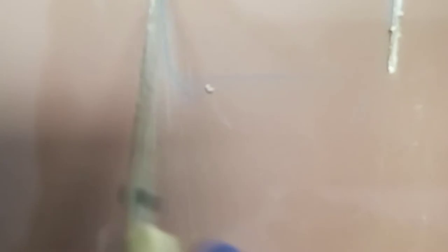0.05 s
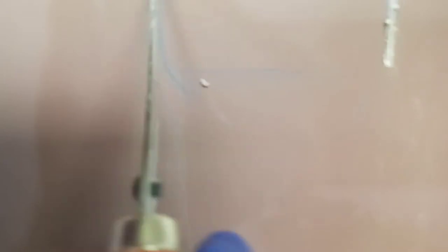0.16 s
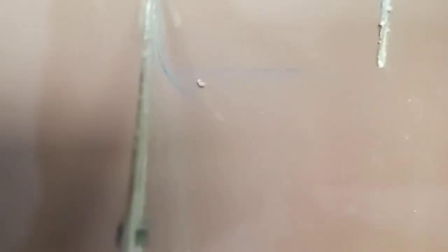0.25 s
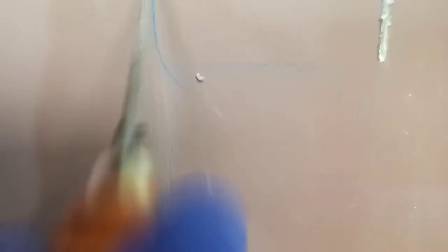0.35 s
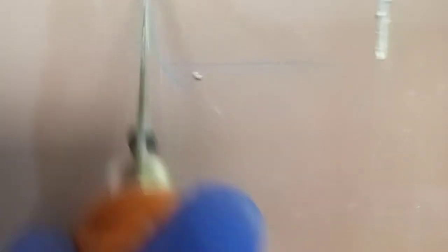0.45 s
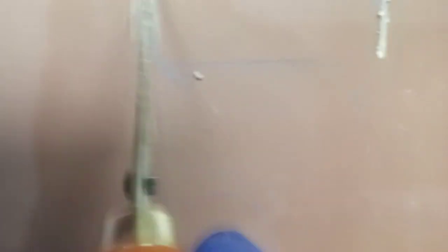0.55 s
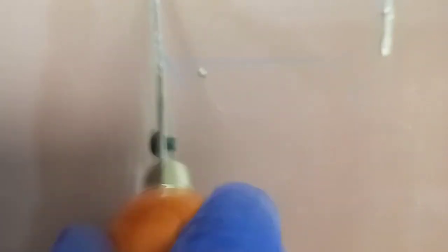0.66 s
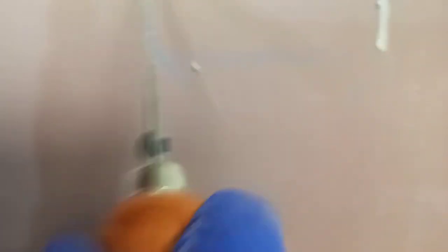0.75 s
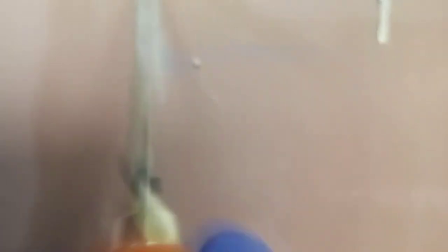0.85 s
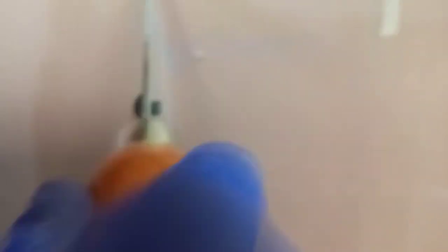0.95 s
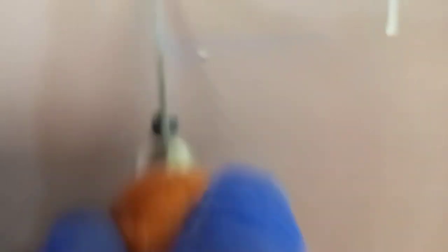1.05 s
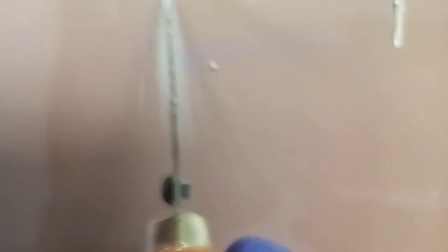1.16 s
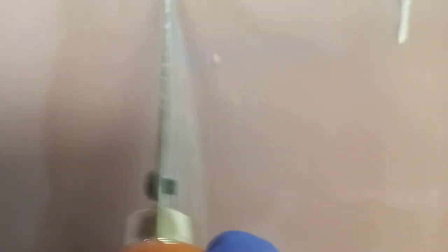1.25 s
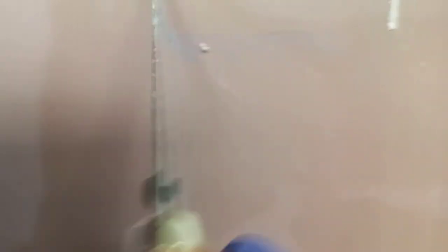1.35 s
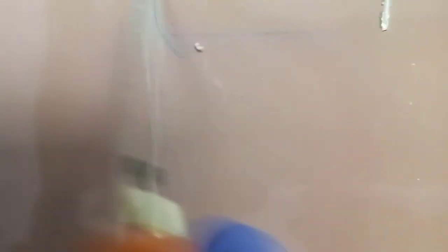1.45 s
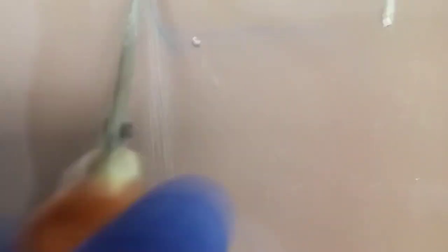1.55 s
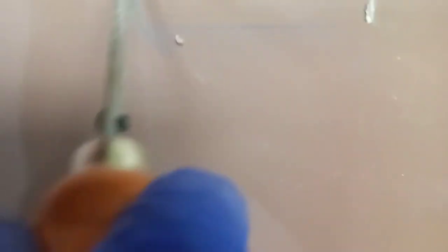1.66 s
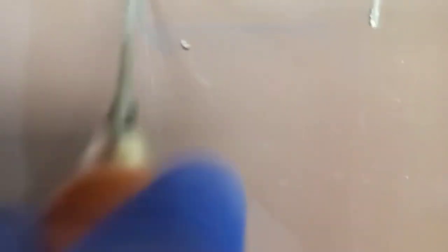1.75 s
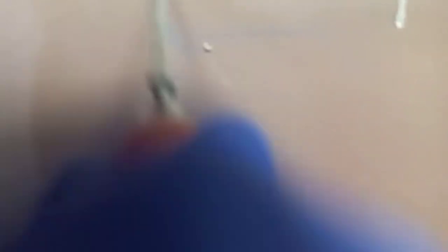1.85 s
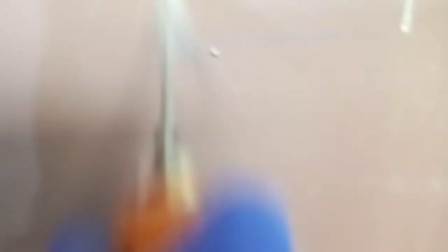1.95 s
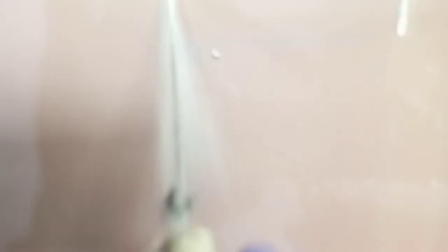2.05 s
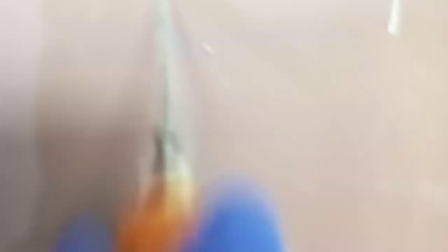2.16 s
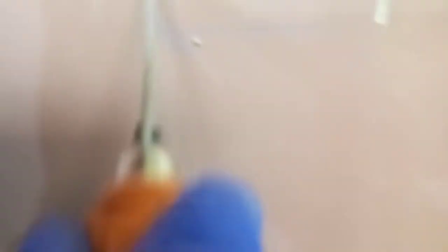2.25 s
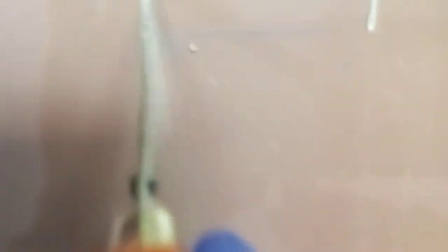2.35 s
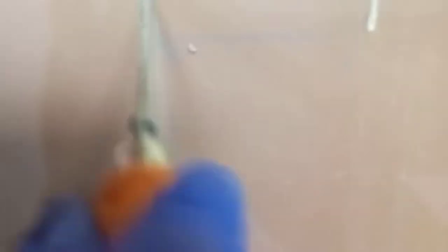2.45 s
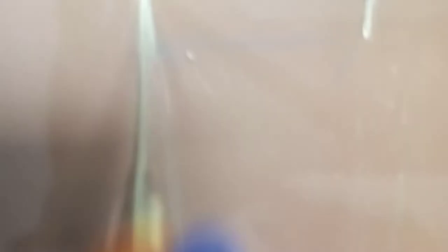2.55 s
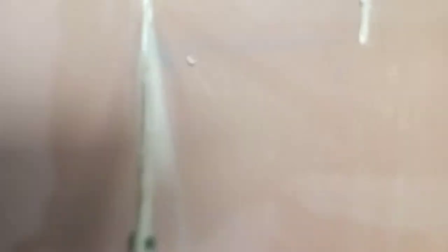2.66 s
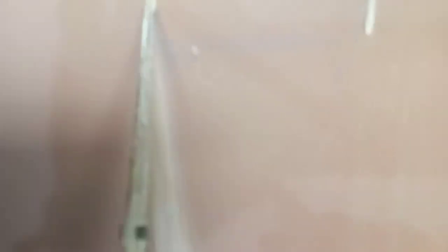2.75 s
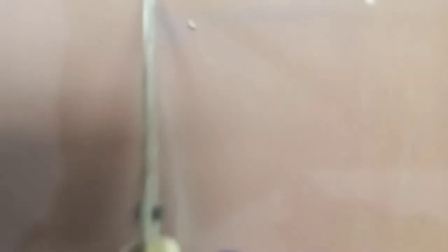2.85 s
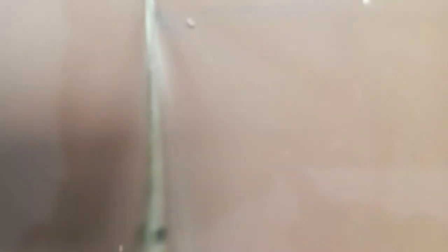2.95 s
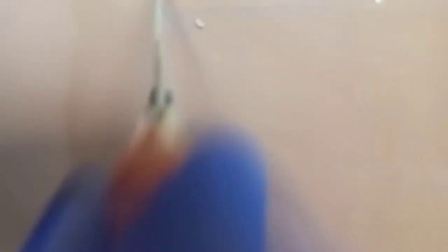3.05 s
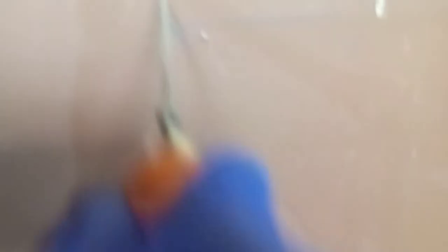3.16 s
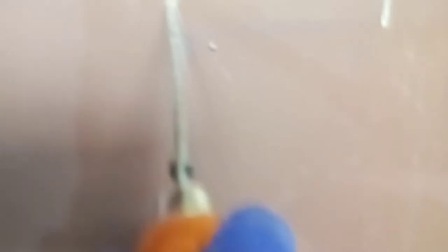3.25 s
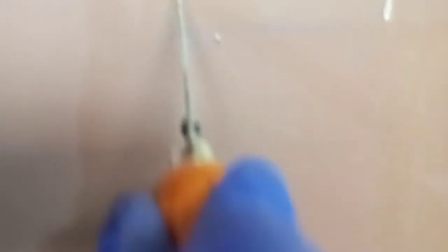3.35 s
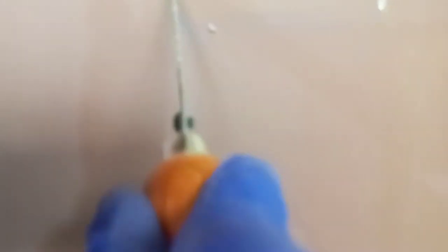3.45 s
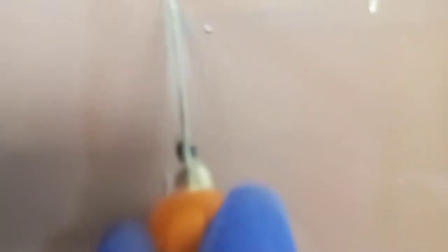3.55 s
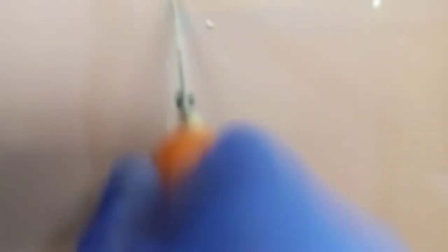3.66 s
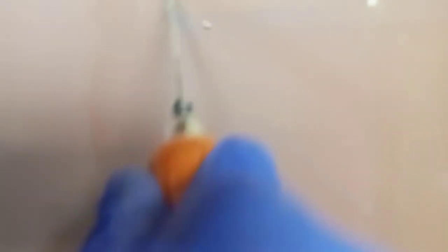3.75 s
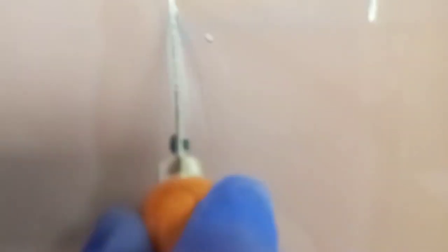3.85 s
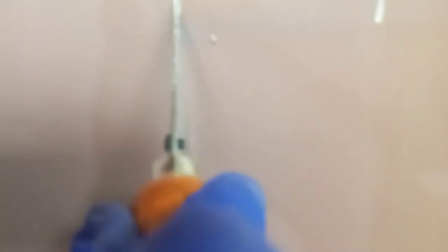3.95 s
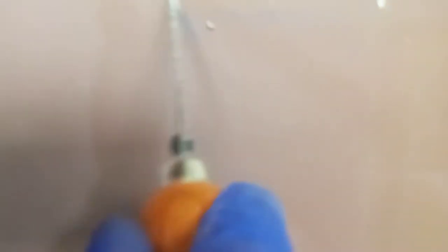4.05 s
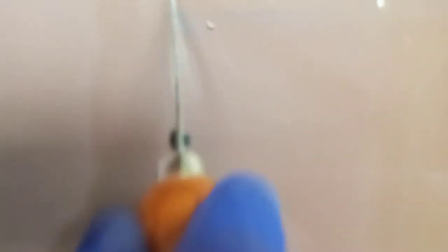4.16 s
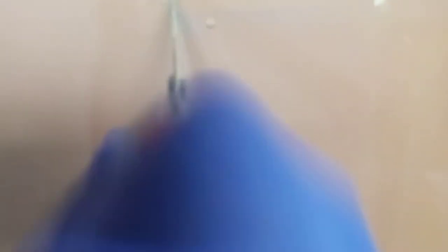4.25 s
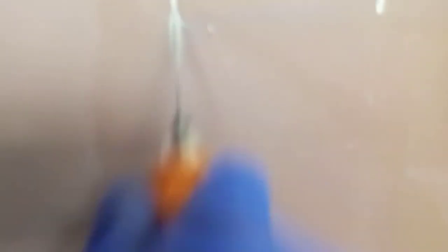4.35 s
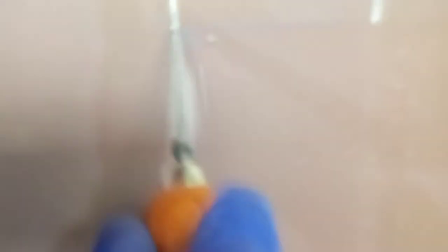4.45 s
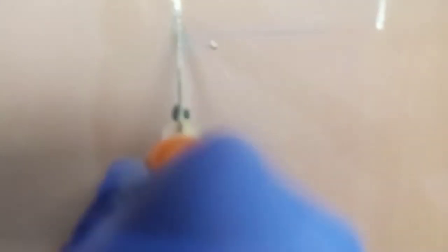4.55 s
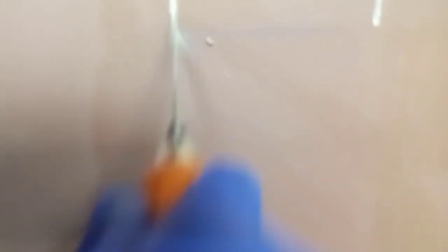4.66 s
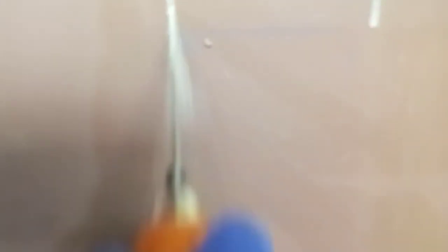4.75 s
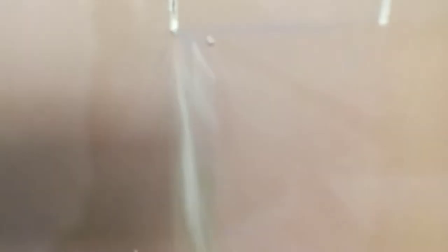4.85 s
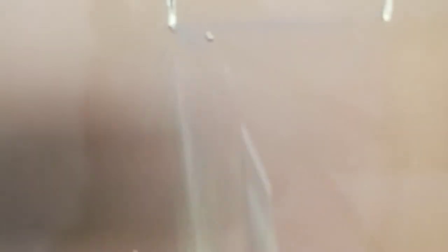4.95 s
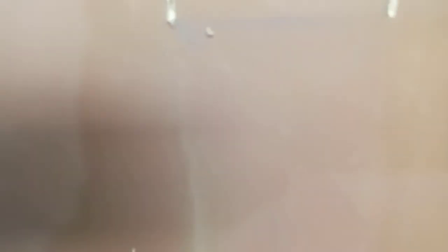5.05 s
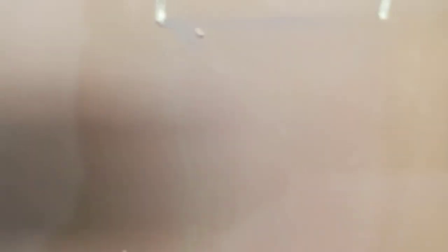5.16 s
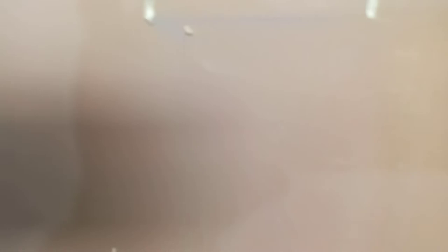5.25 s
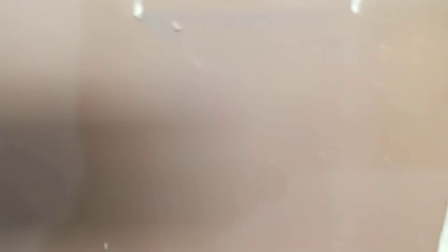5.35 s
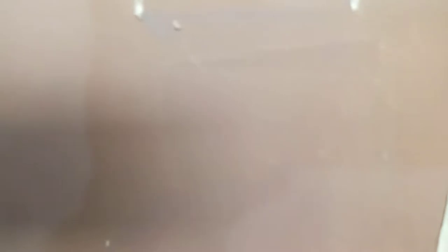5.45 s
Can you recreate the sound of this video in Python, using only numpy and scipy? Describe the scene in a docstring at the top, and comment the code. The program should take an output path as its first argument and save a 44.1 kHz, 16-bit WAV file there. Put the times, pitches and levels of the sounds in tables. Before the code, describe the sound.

Close up in a small bare room, a jab saw cuts drywall by hand. Hard crunchy strokes alternate with lighter, raspy returns, about two to three passes a second with uneven gaps. Teeth knock the hollow panel, gypsum cracks and steel hisses. The panel hums and booms softly. Just before five seconds the sawing stops; the blade scrapes faintly out and a few crumbs tick down into quiet.

```python
"""A jab saw cuts a drywall panel, close up in a small bare room: hard cutting strokes and lighter returns.
Each tooth knocks the board and crushes a pinch of gypsum while the blade rubs in the slot; all three follow
the force and speed of the hand. Teeth catch, chunks crack off, the blade rings or squeaks, and the panel
hums, booms and springs back with soft thumps. At the end the blade judders out of the slot and crumbs fall.
The microphone rounds the loudest peaks and hears little above 15.8 kHz."""
import sys
import numpy as np
from scipy import signal
from scipy.fft import rfft, irfft
from scipy.io import wavfile
from scipy.ndimage import uniform_filter1d

SR = 44100
rng = np.random.default_rng(int(sys.argv[2]) if len(sys.argv) > 2 else 0)


def waveform_to_disk(signal):
    """Save audio, clipped to [-1, 1], as 16-bit WAV at the path in sys.argv[1]."""
    frames = np.transpose(np.atleast_2d(signal))
    scaled = np.clip(frames, -1, 1) * 32767
    samples = np.round(scaled).astype(np.int16)
    wavfile.write(sys.argv[1], SR, samples)


N = 243431
T = np.arange(N) / SR

# Event levels are those ahead of the room and the microphone; colours give only the shape of a spectrum.
# quiet of the room, colour: [f/Hz, level/dB]
QUIET_COLOUR = [(18, -34.5), (30, -17.5), (108, 14), (324, -4.5), (399, -7), (606, -3.5), (970, -9.5),
                (1050, -11), (1260, -21), (5170, -16.5), (6540, 8.5), (7650, -14.5), (15500, -16.5)]
# cutting strokes: [start t/s, length/s, force/dB, share of the length where the blade is fastest,
# extra thud level/dB, extra rub level/dB]
CUTS = [(-0.145, 0.19, -5, 0.74, -1.5, -3.5), (0.218, 0.16, 0.5, 0.49, -0.5, 0.5),
        (0.52, 0.1, 2.6, 0.61, 3.5, 1), (0.765, 0.17, -1.5, 0.62, 3.5, 1),
        (1.342, 0.06, -4, 0.43, -0.5, -3.5), (1.395, 0.15, -2.5, 0.51, -0.5, 1.5),
        (1.64, 0.15, 4.5, 0.55, -0.5, -1), (1.957, 0.071, -5.5, 0.46, -0.5, 0.5),
        (2.034, 0.093, 4, 0.58, -1, 1.5), (2.278, 0.146, 2.5, 0.6, -3.5, -1),
        (2.753, 0.12, -13.5, 0.18, -7, 0), (2.902, 0.19, -1, 0.53, -2.5, 1.5),
        (3.195, 0.15, 0, 0.56, 2.5, 0.5), (3.48, 0.17, 1.1, 0.57, 2.5, 0), (3.958, 0.086, -7, 0.6, 3, -1.5),
        (4.072, 0.16, 5, 0.55, 0.5, -2.5), (4.388, 0.14, 3.5, 0.5, -0.5, -1)]
# return strokes: [start t/s, length/s, force/dB, share of the length where the blade is fastest,
# extra thud level/dB, extra rub level/dB]
RETURNS = [(0.076, 0.12, -11, 0.78, -1, 3.7), (0.328, 0.19, -4, 0.52, -2, 2.2),
           (0.635, 0.15, -4, 0.66, -11, 1), (0.91, 0.22, -4, 0.51, -2, 1.8),
           (1.06, 0.18, -16.5, .15, -4.5, -2.5), (1.242, 0.097, -10, 0.64, -4.5, 1),
           (1.56, 0.093, -10.5, 0.65, -2.5, 1), (1.795, 0.17, -2.5, 0.51, 1, 2.5),
           (2.115, 0.19, -7.5, 0.43, 4, 2.5), (2.42, 0.23, -2, 0.24, -1, 0.5),
           (3.059, 0.14, -4, 0.6, -2, 1.7), (3.36, 0.13, -5, 0.4, 0, 1.5),
           (3.65, 0.15, -5.5, 0.47, 0.5, 1.5), (3.78, 0.12, -10.5, 0.42, 0, 0.5),
           (4.227, 0.15, -3.5, 0.49, 2, 1.5), (4.52, 0.25, -7.5, 0.85, 3.5, 3.5)]
# broad colour of the board: [f/Hz, level/dB]
BOARD_COLOUR = [(15, -69), (25, -17), (75, -8), (100, -6), (124, 1.5), (210, -1), (285, 2.5), (392, -6),
                (439, -13), (679, -8.5), (779, -17), (1480, -25), (1620, -28.5), (2400, -27), (3160, -32.5),
                (5110, -39.5), (6000, -68.5), (7800, -74.5), (13200, -120)]
# panel resonances standing out of that colour: [f/Hz, width/Hz, lift/dB]
PANEL_MODES = [(167, 16, 8), (225.4, 28, 8.5), (386.3, 55, 7), (468.5, 27, 7), (699, 25, 4.5),
               (1000, 41, 8), (1180, 34, -1.5), (1276, 40, 5.5), (1454, 38, 10), (1529, 27, 5),
               (1778, 150, 6), (2395, 130, 7), (2790, 47, 6.5), (3420, 180, 3.5)]
# broad colour of the rubbing blade: [f/Hz, level/dB]
BLADE_COLOUR = [(1650, -31), (2800, -2), (3130, -9), (3450, -3.5), (4210, -6), (4670, -4.5), (5070, -8),
                (6570, 0), (7400, -12), (8460, -20.5), (10600, -11), (13500, -26.5), (15100, -8),
                (16100, -32.5), (16500, -50.5)]
# steel resonances of the blade, before each stroke shifts them: [f/Hz, width/Hz, lift/dB]
STEEL_MODES = [(6630, 350, 3.5), (15200, 920, -0.5)]
# a chunk of gypsum gives way under the teeth: [t/s, peak level/dB]
CRACKS = [(0.145, -37.5), (0.162, -36), (0.293, -39), (0.552, -35), (0.577, -29), (0.595, -37.5),
          (0.833, -36), (0.865, -30), (0.891, -33), (1.657, -44), (1.699, -34), (1.744, -27), (2.049, -31),
          (2.095, -28), (2.296, -33.5), (2.55, -37.5), (2.812, -37.5), (2.969, -30), (2.987, -31.5),
          (3.012, -26.5), (3.243, -29.5), (3.265, -29), (3.295, -29), (3.45, -33), (3.512, -35.5),
          (3.538, -37), (3.578, -29), (3.594, -33.5), (3.723, -37.5), (4.085, -41), (4.126, -34),
          (4.278, -33), (4.338, -63), (4.408, -38), (4.58, -35), (4.694, -38), (4.746, -48)]
# a tooth catches and breaks free: [t/s, peak level/dB]
CATCHES = [(0.253, -28.5), (0.273, -29), (0.527, -28), (0.602, -36), (0.716, -31), (0.802, -33),
           (0.836, -28), (0.868, -29), (1.058, -38), (1.256, -46), (1.352, -32.5), (1.448, -36),
           (1.474, -28), (1.517, -37), (1.67, -32), (1.866, -32), (1.89, -37), (1.911, -27), (1.928, -35),
           (2.203, -44), (2.254, -37), (2.324, -33.5), (2.374, -27), (2.461, -31), (2.572, -35.5),
           (2.813, -33), (2.949, -28), (3.222, -31.5), (3.315, -46), (3.537, -25.5), (3.695, -34),
           (3.762, -33), (3.817, -28.5), (3.969, -41), (4.337, -24), (4.617, -26.5), (4.648, -31)]
# gypsum chips snap and crumbs land: [t/s, peak level/dB]
CHIPS = [(0.292, -39), (2.18, -43), (2.296, -45), (2.813, -42), (2.978, -40.5), (3.243, -41), (3.875, -48),
         (4.745, -51), (4.579, -39), (4.949, -58), (5.004, -64), (5.117, -58), (5.3016, -60),
         (5.3292, -62.5), (5.3607, -54.5), (5.4041, -70.5)]
# colour of chips and crumbs: [f/Hz, level/dB]
CHIP_COLOUR = [(410, -84.5), (700, -42), (2370, -25.5), (2730, -27), (3460, -26), (6480, -6), (7990, -24.5),
               (16000, -27)]
# the bound blade rings briefly in one mode: [crest t/s, peak level/dB, f/Hz]
RINGS = [(0.401, -52, 2454), (0.587, -47.5, 2300), (0.891, -52, 6500), (0.899, -45, 1464),
         (1.431, -58, 6700), (1.704, -55.5, 2411), (1.704, -45.5, 6660), (1.872, -48, 2325),
         (2.175, -47, 2420), (2.456, -51, 2300), (2.957, -50, 1490), (2.984, -45.5, 6620),
         (3.239, -52, 2620), (3.428, -58, 6470), (3.712, -50, 2340), (4.284, -54, 2520), (4.432, -57, 2460),
         (4.495, -49, 3320), (4.583, -49, 6300)]
# the loose panel swings with a low boom: [crest t/s, crest level/dB]
SWINGS = [(0.902, -44), (1.756, -31), (1.929, -34.5), (2.106, -38), (2.393, -37.5), (2.535, -50),
          (3.442, -42), (3.681, -49), (4.222, -37), (4.367, -41), (4.752, -49)]
# the panel springs back from the blade and rings: [t/s, peak level/dB]
THUMPS = [(1.082, -33), (2.605, -40.5), (3.845, -37.5), (5.019, -42)]
# ring of the released panel: [starting f/Hz, relative level/dB, T60/s]
THUMP_MODES = [(196, -13, 0.14), (248.5, 8.5, 0.0705), (284.5, -3, 0.17), (515, -24, 0.11)]
# the steel squeaks in the slot: [t/s, peak level/dB, mean f/Hz, length/s]
SQUEAKS = [(4.178, -40, 3470, 0.029), (4.485, -34.5, 3400, 0.0076)]
# the blade slides out of the slot, level before judder: [t/s, level/dB]
SLIDE = [(4.83, -85), (4.91, -83), (5.012, -70), (5.028, -73), (5.106, -65.5), (5.166, -68.5),
         (5.208, -68.5), (5.29, -87)]
# colour of the sliding blade: [f/Hz, level/dB]
SLIDE_COLOUR = [(530, -96), (900, -20.5), (1670, -10), (2330, -13), (3560, -4), (4330, -9.5), (6540, 3),
                (8450, -20), (10500, -7.5), (13400, -27), (15200, -7), (15900, -21), (16500, -36)]
# rasp of the tip as it leaves: [f/Hz, level/dB]
TIP_COLOUR = [(500, -63), (1200, -20), (3000, -28), (6500, 8.5), (8400, -6), (10500, 2), (13000, -11),
              (15000, 2), (16500, -35)]
# teeth tick against the edge of the slot on the way out: [t/s, peak level/dB]
TICKS = [(4.867, -85), (5.003, -60.5), (5.117, -65.5), (5.211, -66)]
# colour of those ticks: [f/Hz, level/dB]
TICK_COLOUR = [(500, -43), (1000, -5), (1550, -3), (2300, -15), (6500, -15), (12000, -40)]

QUIET_DB = -86.5  # rms
TOOTH_HZ = 172.04  # teeth passing per second at full speed
BITE_S = 0.024  # mean time that the teeth work at one spot before it gives way
STALL_S, STALL_SHARE = 0.008, 0.75  # half-length and depth of one slowing of the blade around a crack
THUD_DB, CRUNCH_DB, RUB_DB = -42.5, -43, -54.5  # at full speed and a force of 0 dB, before the extras
THUD_PER_FORCE, RUB_PER_FORCE = 0.74, 0.67  # dB per dB of force; the crunch follows the force one to one
THUD_SPEED_POWER, CRUNCH_SPEED_POWER, RUB_SPEED_POWER = 0.43, 0.96, 0.71  # growth with blade speed
PANEL_HZ = 281.4  # typical main resonance of the panel under the blade
PANEL_SCATTER = 0.21  # spread of its natural logarithm from bite to bite
LOOSENING_S = 0.72  # time constant of the panel coming loose as the slot grows
FLEX_THUD_DB, FLEX_SAG = 3, 0.28  # on a return a fully loose panel knocks harder, and lower by this share
BOOM_HZ, BOOM_T60_S = 120.1, 0.41  # lowest bending mode of the panel
BOOM_DB, BOOM_PER_FORCE = -54.5, 0.43  # level of a half-loose panel at a force of 0 dB; dB per dB of force
BOOM_TIGHT_DB = -7  # a tight panel against a fully loose one
HUM_HZ, HUM_T60_S, HUM_DB = 275.3, 0.1, -5  # the panel's singing mode; gain on what shakes it
HUM_DRIFT = 0.0744  # typical drift as a share of its pitch
ROOM_T60_LOW_S, ROOM_T60_HIGH_S = 0.33, 0.24
TOP_HZ = 15800  # upper limit of the microphone


def undb(db):
    """Decibels to gain."""
    return 10 ** (np.asarray(db) / 20)


def unit(x):
    """Scale to rms 1."""
    return x / np.sqrt(np.mean(x ** 2))


def peak(sound, db):
    """Scale to a peak level."""
    return sound * undb(db) / np.abs(sound).max()


def band(x, hz, kind, order=2):
    """Butterworth low-pass or high-pass."""
    return signal.sosfilt(signal.butter(order, min(hz, .45 * SR), kind, fs=SR, output="sos"), x)


def ring(x, response):
    """Drive a response scaled to unit energy."""
    return signal.fftconvolve(x, response / np.linalg.norm(response))[:N]


def drive(force, strength, response):
    """Shake a body so that its sound carries the energy of the strength curve."""
    sound = signal.fftconvolve(force * strength, response)
    return sound * np.linalg.norm(strength) / np.linalg.norm(sound)


def fade(t60):
    """Exponential decay down to -60 dB."""
    return np.exp(-np.log(1000) * T[T < t60] / t60)


def add(out, s, sound):
    """Mix in a sound at time s; what falls before the start is left out."""
    i = int(s * SR)
    sound, i = sound[max(-i, 0):], max(i, 0)
    out[i:i + len(sound)] += sound[:N - i]


def walk(per_s):
    """Smooth random drift; spread near 1."""
    steps = signal.resample_poly(rng.standard_normal(600), 16, 1)
    return np.interp(T * per_s * 16, np.arange(len(steps)), steps)


def body(colour, modes=(), size=4096):
    """Causal impulse response of a broad colour with resonances on top."""
    hz = np.arange(size // 2 + 1) * SR / size
    points, levels = np.transpose(colour)
    db = np.interp(np.log(hz + 1), np.log(points), levels)
    for centre, width, lift in modes:
        db = db + lift / (1 + (2 * (hz - centre) / width) ** 2)
    # folding the cepstrum gives minimum phase
    cepstrum = irfft(np.log(undb(db)))
    cepstrum[1:size // 2] *= 2
    cepstrum[size // 2 + 1:] = 0
    return irfft(np.exp(rfft(cepstrum))) * np.hanning(2 * size)[size:]


def wander(modes, spread, spread_db):
    """Resonances shift with the place and pressure of the blade."""
    chance = rng.standard_normal((len(modes), 2))
    shifted = []
    for (hz, width, db), (pitch, level) in zip(modes, chance):
        shifted.append((hz * (1 + spread * pitch), width, db + spread_db * level))
    return shifted


def grains(count, per_s, spread_db, size=SR):
    """Dense fractures at random moments, their sizes spread by an exponential law in dB; rms 1."""
    chance = rng.random((3, size))[:, :count]
    weight = undb(spread_db * np.minimum(-np.log(1 - chance[0]), 3.2))
    return unit((chance[1] < per_s / SR) * weight * np.sign(chance[2] - .5))


def snaps(events, response, t60, rise_s):
    """Brittle breaks: a short burst of noise into a body, which response() gives anew for each."""
    out = np.zeros(N)
    swell = fade(t60) * (1 - np.exp(-T[T < t60] / rise_s))
    for s, db in events:
        burst = swell * rng.standard_normal(SR)[:len(swell)]
        add(out, s, peak(signal.fftconvolve(burst, response()), db))
    return out


def room_quiet():
    """Steady coloured noise: the quiet of the room."""
    return undb(QUIET_DB) * ring(rng.standard_normal(N), body(QUIET_COLOUR))


def sawing():
    """Cuts and returns; the panel comes loose as the slot grows, and the returns flex it."""
    out, free = np.zeros(N), stalls()
    for strokes, returning in ((CUTS, False), (RETURNS, True)):
        for start, length, force_db, crest, thud_db, rub_db in strokes:
            loose = 1 - np.exp(-max(start, 0) / LOOSENING_S)
            place = T[T < length] / length
            speed = np.sin(np.pi / 2 * np.interp(place, [0, np.clip(crest, .1, .9), 1], [0, 1, 0]))
            speed = speed * np.interp(start + T[:len(speed)], T, free)
            add(out, start, stroke(speed, force_db, thud_db, rub_db, loose, flex=loose * returning))
    return out


def stalls():
    """Share of its speed that the blade keeps: it is held up around each crack, mostly just before."""
    held = np.zeros(N)
    dip = np.hanning(int(2 * STALL_S * SR))
    for s, _ in CRACKS:
        add(held, s - len(dip) / SR * .75, dip)
    return 1 - np.clip(STALL_SHARE * held, 0, .95)


def stroke(speed, force_db, thud_db, rub_db, loose, flex, split_hz=450, crumble_t60=0.062,
           steady_crunch=1.0, steady_rub=0.85, crack_share=0.14, flecks_db=-11, rub_grip=0.56):
    """One pass, rest to rest: teeth knock the panel, each sets off a crumble, steel hisses through dust."""
    count = len(speed)
    # strength curves set by the hand
    thud_level = THUD_DB + thud_db + THUD_PER_FORCE * force_db + FLEX_THUD_DB * flex
    thud = undb(thud_level) * speed ** THUD_SPEED_POWER
    boom = undb(BOOM_DB + BOOM_PER_FORCE * force_db + BOOM_TIGHT_DB * (0.5 - loose)) * speed
    crunch = undb(CRUNCH_DB + force_db) * speed ** CRUNCH_SPEED_POWER
    rub = undb(RUB_DB + rub_db + RUB_PER_FORCE * force_db) * speed ** RUB_SPEED_POWER

    bite, grip = bites(count)
    strikes = teeth(speed)
    crumble = unit(signal.fftconvolve(strikes, fade(crumble_t60))[:count])
    # the crack of the tooth itself, then the grains that it loosens
    loosened = unit((crumble + steady_crunch) * grains(count, per_s=3500, spread_db=3.5))
    breaking = crack_share * unit(strikes) + loosened
    rubbing = (crumble + steady_rub) * grains(count, per_s=11000, spread_db=0.0)
    breaking = crackle(breaking * grip, bite, low_hz=820, high_hz=3930, sharpness=24, lift_db=3.5)
    rubbing = crackle(rubbing * grip ** rub_grip, bite, low_hz=4420, high_hz=7450, sharpness=56, lift_db=5)
    # knocks without their steady push
    knocking = strikes * grip - uniform_filter1d(strikes * grip, size=900)

    sound = drive(knocking, boom, bending())
    add(sound, 0, thudding(knocking, thud, bite, PANEL_HZ * (1 - FLEX_SAG * flex), split_hz))
    add(sound, 0, drive(breaking, crunch, band(loaded_board(), split_hz, "high", order=3)))
    add(sound, 0, drive(rubbing, rub, rubbed_blade(force_db)))
    add(sound, 0, undb(flecks_db) * crunch * flecks(strikes * grip))
    return sound


def bites(size, hold=1.0, swell_power=2.2, crest_power=0.78, spread_db=2.0, count=24):
    """Gypsum gives way in bites with slack between: the bite's number and its grip at each moment."""
    chance = rng.random((count, 2))
    edges = np.cumsum(BITE_S * (.5 + chance[:, 0]))
    place = np.interp(T[:size] + edges[0] + BITE_S * chance[-1, 0], edges, np.arange(count))
    bite = place.astype(int)
    swell = np.abs(np.sin(np.pi * (place - bite) ** crest_power)) ** swell_power
    return bite, (hold + swell) * undb(spread_db * (2 * chance[bite, 1] - 1))


def teeth(speed, jitter=0.3227, scatter_db=5, crawl=.35):
    """One impulse as each tooth meets the gypsum, uneven in time and size."""
    passed = np.cumsum(TOOTH_HZ * (abs(crawl) + speed) / (1 + abs(crawl))) / SR
    chance = rng.standard_normal((100, 2))
    at = np.searchsorted(passed, np.arange(len(chance)) + jitter * chance[:, 0])
    size = undb(scatter_db * np.clip(chance[:, 1], -2.5, 1.1))
    # teeth beyond the end of the stroke gather in the last slot, which is dropped
    return np.bincount(at, size, len(speed) + 1)[:len(speed)]


def crackle(force, bite, low_hz, high_hz, sharpness, lift_db, count=24):
    """Each bite crackles at its own resonant pitch; rms 1."""
    pitches = low_hz * (high_hz / low_hz) ** rng.random(count)
    out = force.copy()
    for k in np.unique(bite):
        resonance = signal.iirpeak(pitches[k], sharpness, fs=SR)
        out += undb(lift_db) * signal.lfilter(*resonance, force * (bite == k))
    return unit(out)


def bending(size=16384):
    """Impulse response of the panel's lowest bending mode."""
    t = T[:size]
    decay = np.exp(-np.log(1000) * t / BOOM_T60_S)
    return band(decay * np.sin(2 * np.pi * BOOM_HZ * t), 150, "high", order=3)


def thudding(knocks, strength, bite, panel_hz, split_hz, width_hz=50, lift_db=6, count=5):
    """Low knocking of the panel: its main resonance jumps as each bite loads it differently."""
    out = 0
    for k, shift in enumerate(np.clip(rng.standard_normal(count), -2, 2)):
        main_mode = (panel_hz * np.exp(PANEL_SCATTER * shift), width_hz, lift_db)
        response = body(BOARD_COLOUR, PANEL_MODES + [main_mode])
        out = out + signal.fftconvolve(knocks * strength * (bite % count == k), response)
    out = band(out, split_hz, "low", order=3)
    return out * np.linalg.norm(strength) / np.linalg.norm(out)


def loaded_board():
    """The panel under the blade, its modes slightly shifted."""
    return body(BOARD_COLOUR, wander(PANEL_MODES, spread=0.0044, spread_db=0.0))


def rubbed_blade(force_db, brightening=0.35):
    """The blade during one stroke; the harder it rubs, the brighter its top."""
    top = (14000, 5000, brightening * force_db)
    return body(BLADE_COLOUR, wander(STEEL_MODES, spread=0.012, spread_db=1.5) + [top])


def flecks(strikes, low_hz=700, high_hz=3800, cycles=9, tilt=0.93):
    """Each tooth flicks a sliver of gypsum that rings for a few cycles at its own pitch; rms 1."""
    t = T[:SR // 50]
    out = np.zeros(len(strikes) + len(t))
    at = np.flatnonzero(strikes)
    for i, hz in zip(at, low_hz * (high_hz / low_hz) ** rng.random(size=100)):
        ringing = np.sin(2 * np.pi * hz * t) * (hz * t) * np.exp(-np.pi * hz * t / cycles)
        out[i:i + len(t)] += strikes[i] * (low_hz / hz) ** tilt * ringing
    return unit(out[:len(strikes)])


def hum(shaking, drifts_per_s=5):
    """The shaken panel sings on between strokes, its pitch wandering with the pressure of the blade."""
    turn = np.exp(2j * np.pi * np.cumsum(HUM_HZ * (1 + HUM_DRIFT * walk(drifts_per_s))) / SR)
    keep = np.exp(-np.log(1000) / (HUM_T60_S * SR))
    # shift the moving pitch to 0 Hz, smooth there, shift back
    held = signal.lfilter([1 - keep], [1, -keep], shaking / turn)
    return undb(HUM_DB) * 2 * np.real(turn * held)


def cracks():
    """Chunks give way: noise bursts through the loaded board, its bass thinned."""
    return snaps(CRACKS, lambda: band(loaded_board(), 490, "high"), t60=0.053, rise_s=0.00057)


def catches(soft_hz=750):
    """A snagged tooth lets go and the bent panel thumps back."""
    out = np.zeros(N)
    board = body(BOARD_COLOUR, PANEL_MODES)
    thump = band(band(board, soft_hz, "low"), 310, "high", order=1)
    for s, db in CATCHES:
        add(out, s, peak(-thump, db))
    return out


def chips():
    """Chips snap and crumbs land: short bright bursts."""
    return snaps(CHIPS, lambda: body(CHIP_COLOUR), t60=0.024, rise_s=0.00072)


def rings(length_s=0.055, width_hz=90):
    """Friction keeps one mode of the bound blade going, unsteadily."""
    out = np.zeros(N)
    swell = np.hanning(int(length_s * SR))
    for s, db, hz in RINGS:
        resonance = signal.iirpeak(hz, hz / width_hz, fs=SR)
        rubbed = signal.lfilter(*resonance, rng.standard_normal(SR // 4))
        add(out, s - length_s / 2, peak(swell * rubbed[-len(swell):], db))
    return out


def swings(hz=119, width_s=0.026, detune=0.018):
    """The lowest bending mode swells and dies as the blade drags the panel along."""
    out = np.zeros(N)
    t = T[:SR // 4] - 1 / 8  # 0 at the crest
    for (s, db), shift in zip(SWINGS, rng.standard_normal(len(SWINGS))):
        tone = np.sin(2 * np.pi * hz * (1 + detune * shift) * t)
        add(out, s + t[0], undb(db) * np.exp(-(t / width_s) ** 2) * tone)
    return out


def thumps(release_s=0.0077, sag_hz_per_s=60):
    """Let go by the blade, the panel springs back with a hollow, slightly falling ring."""
    out = np.zeros(N)
    t = T[:SR]
    sway = 0
    for hz, db, t60 in THUMP_MODES:
        sway = sway + undb(db - 60 * t / t60) * np.sin(2 * np.pi * (hz - sag_hz_per_s * t / 2) * t)
    sway = band(sway * (1 - np.exp(-(t / release_s) ** 2)), 100, "high")
    for s, db in THUMPS:
        add(out, s, peak(sway, db))
    return out


def squeaks(waver=0.063, rasp=1.0):
    """The blade sticks and slips at an unsteady pitch, with a rough rasp an octave below."""
    out = np.zeros(N)
    for s, db, hz, length_s in SQUEAKS:
        swell = np.hanning(int(length_s * SR))
        slip = unit(band(rng.standard_normal(SR), 700, "low"))[:len(swell)]
        phase = 2 * np.pi * np.cumsum(hz * (1 + waver * slip)) / SR
        tone = (1 + .5 * slip) * np.sin(phase) + rasp * (.5 + .5 * slip) * np.sin(phase / 2)
        add(out, s, peak(swell * tone, db))
    return out


def withdrawal(tip_s=5.207, tip_width_s=0.023, tip_db=-59, judder_db=3.0, judders_per_s=55):
    """The blade judders out of the slot as grainy friction, with a rasp as its tip leaves."""
    sliding = (T > SLIDE[0][0]) * (T < SLIDE[-1][0])
    gain = undb(np.interp(T, *np.transpose(SLIDE)) + judder_db * walk(judders_per_s)) * sliding
    friction = grains(N, per_s=2600, spread_db=2, size=N)
    tip = undb(tip_db) * np.exp(-((T - tip_s) / tip_width_s) ** 2)
    slide = ring(friction * gain, band(body(SLIDE_COLOUR), 15000, "low", order=1))
    return slide + ring(friction * tip, body(TIP_COLOUR))


def ticks():
    """Teeth tick on the edge of the slot: short bursts on the way out."""
    return snaps(TICKS, lambda: body(TICK_COLOUR), t60=0.032, rise_s=.001)


def room(x, low_db=-6, high_db=-10, split_hz=380, gap_s=0.0083):
    """Direct sound plus the diffuse tail of a small bare room; the bass hangs on longest."""
    out = x
    for kind, t60, db in (("low", ROOM_T60_LOW_S, low_db), ("high", ROOM_T60_HIGH_S, high_db)):
        tail = fade(t60)
        tail = tail * rng.standard_normal(N)[:len(tail)] * (T[:len(tail)] > gap_s)
        out = out + undb(db) * ring(band(x, split_hz, kind, order=4), tail)
    return out


def scene(thump_wet=0.35):
    """Sawing and all that it sets off, then the withdrawal, in a quiet room; thumps reach us drier."""
    shaking = sawing() + catches()
    dry = shaking + hum(shaking) + cracks() + chips() + rings() + swings() + squeaks()
    dry = dry + withdrawal() + ticks()
    springing = thumps()
    # the thumps keep their full direct sound but send less into the room
    heard = room(dry + thump_wet * springing) + (1 - thump_wet) * springing
    return (heard + room_quiet())[None]


def record(dry, ceiling_db=-23):
    """The microphone rounds the loudest peaks and the top is cut."""
    rounded = undb(ceiling_db) * np.tanh(dry / undb(ceiling_db))
    return signal.sosfilt(signal.ellip(10, .2, 70, TOP_HZ, fs=SR, output="sos"), rounded)


dry = scene()
out = record(dry)
waveform_to_disk(out)
```